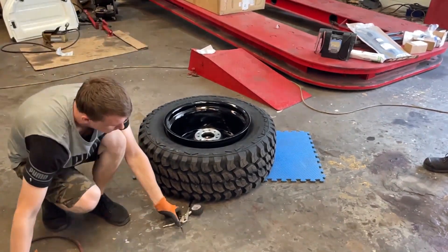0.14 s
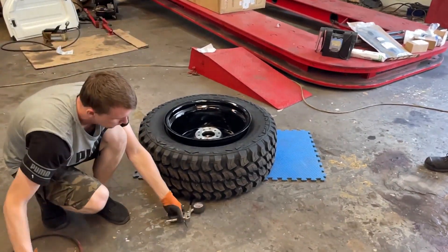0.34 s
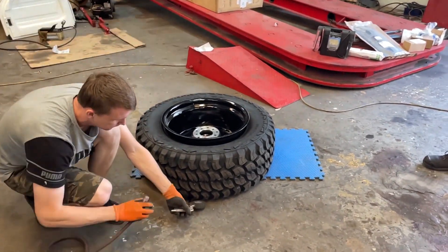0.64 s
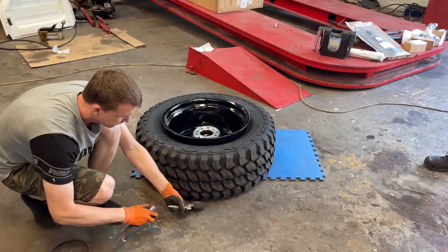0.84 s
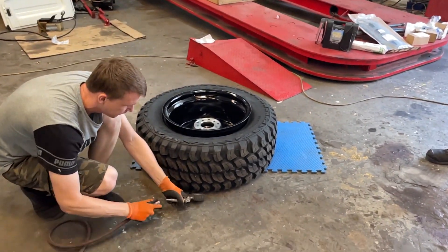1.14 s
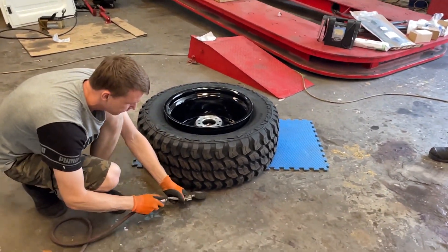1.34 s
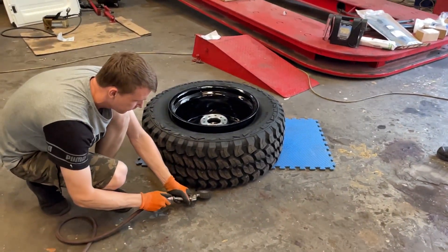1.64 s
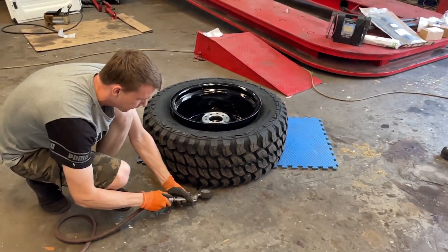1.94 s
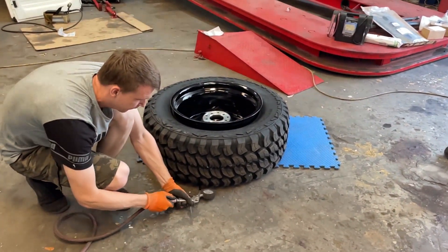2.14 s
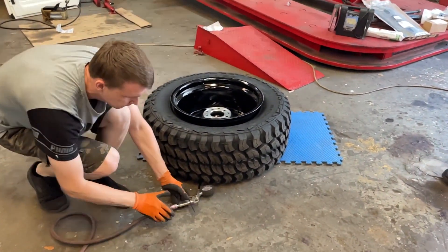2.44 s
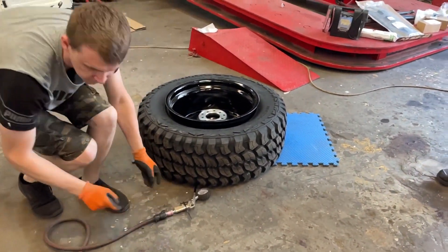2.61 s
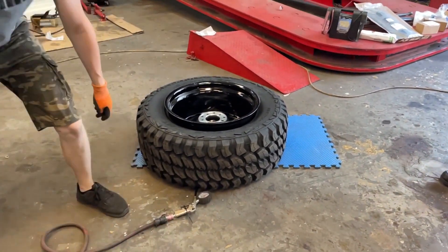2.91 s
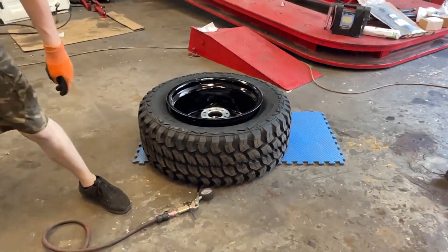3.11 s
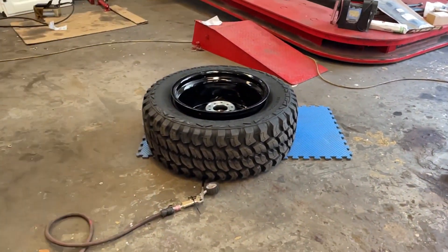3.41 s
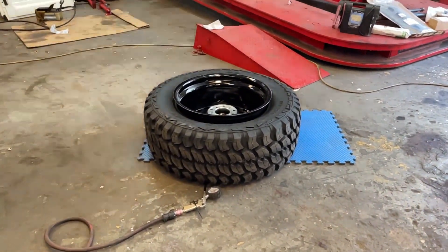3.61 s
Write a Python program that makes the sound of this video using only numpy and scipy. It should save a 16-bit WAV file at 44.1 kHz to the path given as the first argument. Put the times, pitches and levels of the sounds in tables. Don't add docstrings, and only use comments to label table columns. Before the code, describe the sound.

A loud, bright air-hose hiss breaks out after quiet motor drone and a small metal tick

```python
import sys
import numpy as np
from scipy import signal
from scipy.fft import rfft, irfft
from scipy.io import wavfile
from scipy.ndimage import uniform_filter1d

SR = 44100
rng = np.random.default_rng(int(sys.argv[2]) if len(sys.argv) > 2 else 0)


def boost(x):
    u = np.asarray(x, float) / 20
    return 10 ** u


def wrap_up_sound(samples):
    columns = np.atleast_2d(samples).T
    tamed = np.clip(columns, -1, 1)
    steps = np.round(tamed * 32767).astype(np.int16)
    wavfile.write(sys.argv[1], SR, steps)


N = 165816
T = np.arange(N) / SR
HZ = np.fft.rfftfreq(N, 1 / SR)

# t/s, level/dB
AIR_FLOW = [(1.25, -70), (1.42, -45), (1.62, -36.5), (1.646, -36.5), (1.69, -38), (1.95, -38), (2.062, -33),
            (2.081, -21), (2.084, -18), (2.104, -13), (2.15, -17.5), (2.185, -14.5), (2.226, -19.5),
            (2.41, -18), (2.5, -20), (2.67, -19), (2.71, -21.5), (3.76, -21.5)]
# f/Hz, density/dB per Hz
JET_COLOUR = [(250, -45), (900, -16), (2000, -9.5), (3600, -6), (5000, -4.5), (7000, -5.5), (10000, -4),
              (16000, -5.5)]
# f/Hz, width/Hz, level/dB (level unused; every mode is added at the same level)
COUPLING_MODES = [(1700, 9.6, -16), (1995, 43, -13), (2640, 24, -13), (3920, 19, -10), (4610, 49, -8),
                  (5100, 156, -7), (5800, 190, -5), (6155, 42, -6), (8200, 110, -6), (8500, 25, -7),
                  (9020, 180, -3), (10920, 140, -1), (11570, 160, 0), (12060, 22, -3)]
# start/s, length/s, from f/Hz, to f/Hz, level/dB
LEAK_WHISTLES = [(1.53, .18, 10800, 12200, -44), (1.6, .1, 11900, 12200, -48), (1.5, .1, 11300, 11700, -49),
                 (1.48, .3, 5600, 5350, -49), (1.72, .17, 5300, 4950, -48), (1.55, .3, 6000, 6300, -50),
                 (1.8, .27, 6200, 6800, -50), (1.8, .27, 8600, 9300, -49), (1.68, .39, 10700, 11400, -49),
                 (1.43, .2, 7600, 8300, -52), (1.45, .25, 8700, 9100, -52), (1.6, .15, 7400, 7800, -51),
                 (1.5, .3, 6700, 7000, -52), (1.75, .3, 7200, 7700, -55)]
# t/s, peak/dB, f/Hz
TICK_PARTIALS = [(.3571, -24, 8800), (.3573, -35, 11800), (.3574, -41, 13300), (.3575, -42, 15000),
                 (.36, -36, 6000), (.3625, -35, 7400), (.3675, -40, 8500), (1.514, -33, 2700),
                 (1.518, -31, 2950), (1.523, -33, 3300), (1.642, -35, 4400), (1.645, -35, 7800),
                 (1.647, -36, 5800), (1.648, -36, 9300), (1.651, -34, 3500)]
# t/s, level/dB
MOTOR_LOAD = [
    (0, 1),
    (.35, -2.5),
    (.7, -0.5),
    (1.2, 1.5),
    (1.8, 3),
    (2.0, 0),
    (2.07, 4),
    (2.3, 2.5),
    (3.76, -1.5),
]
# multiple of shaft rate, level/dB
MOTOR_ORDERS = [(1, -58), (4, -51), (7, -61.5), (8, -54), (10, -53), (11, -58), (12, -52), (13, -60),
                (14, -56.5)]
# t/s, level/dB
SECOND_ORDER = [(0.0, -48), (0.25, -49), (0.31, -42), (0.75, -48.5), (0.82, -39.5), (1.3, -47),
                (1.56, -42.5), (1.6, -62), (1.8, -48), (1.97, -49), (2.01, -37.5), (2.08, -40)]
# t/s, level/dB
THIRD_ORDER = [(0.0, -56), (0.04, -56.5), (0.65, -46), (0.72, -65), (1.22, -41), (1.33, -63), (1.37, -48),
               (1.47, -53.5), (1.81, -41), (1.84, -55), (2.03, -43), (2.1, -47.5)]
# f/Hz, density/dB per Hz
HALL_COLOUR = [(35, -21), (60, -3), (200, -9.5), (290, -13), (600, -5.5), (850, -8), (3500, -19.5),
               (16000, -39.5)]
# f/Hz, gain/dB
MIC_COLOUR = [(30, 1), (8600, -0.5), (9800, 7.5), (11000, 8.5), (12000, 1), (13000, -0.5), (14000, -8.5),
              (16000, -10.5)]
# f/Hz, likeness/0-1, right lead/rad, left-right level/dB
PORT_PAIR = [(40, 0.98, 0.5, 1.5), (130, 0.99, -0.16, -0.5), (200, 0.85, -1, 1), (450, 0.5, 1, -2),
             (820, .5, 1.5, 0), (2350, 0.49, 1.5, -3), (4870, 0.1, 2.5, 1), (6300, 0.8, 0.5, 4),
             (6800, 0, -3, -7), (7780, 0.74, 1, 3.5), (8860, 0.6, 1, -2), (10000, 0.97, 0, 0.5),
             (12000, 0.91, -0.5, 0)]
# f/Hz, right lead/half turns
TREBLE_TURNS = [(8600, 0), (10200, 1), (12050, 2), (13800, 3), (15600, 4)]
# f/Hz, level/dB per bin
FAINT_LINE = [(60, -96), (300, -75.5), (1000, -75.5), (3500, -72.5), (6000, -78.5), (11000, -85),
              (12200, -75.5), (16000, -72.5)]

TICK_S = 0.3573


def rms_one(x):
    return x / np.sqrt(np.mean(x ** 2) + 1e-20)


def in_time(rows):
    return np.interp(T, *np.transpose(rows))


def at_hz(points, column=1):
    points = np.array(points)
    return np.interp(np.log(HZ + 1), np.log(points[:, 0]), points[:, column])


def colour(x, gain):
    return irfft(rfft(x) * gain, N)


def drift(rate_hz, size=N):
    r = np.exp(-2 * np.pi * rate_hz / SR)
    run_in = SR // 2
    noise = rng.standard_normal(size + run_in)
    slow = signal.lfilter([1], [1, -2 * r, r * r], noise)[run_in:]
    return rms_one(slow - slow.mean())


def ring(start_s, hz, t60_s):
    t = np.maximum(T - start_s, 0)
    return np.sin(2 * np.pi * hz * t) * boost(-60 * t / t60_s)


def jet():
    hose_hz, hose_ring, hose_top_hz = 157.03, 0.45, 3360
    body_per_db, top_per_db, ref_db = 0.19, 0.2, -22
    thin_hz, top_hz = 2730, 9900
    flow_db = in_time(AIR_FLOW)

    loop = hose_ring / (1 + (HZ / hose_top_hz) ** 4)
    comb = np.abs(1 - loop * np.exp(-2j * np.pi * HZ / hose_hz))
    hose = np.sqrt(1 - loop ** 2) / comb
    sputter_db = 0.4 * drift(402)
    noise = rng.standard_normal((2, N)) * boost(sputter_db)
    air = rms_one(colour(noise, boost(at_hz(JET_COLOUR) + at_hz(MIC_COLOUR)) * hose))

    spectrum = rfft(air)
    for hz, width_hz, _ in COUPLING_MODES:
        mode = irfft(spectrum / (1 + ((HZ - hz) / width_hz) ** 2), N)
        flutter_db = 3.5 * drift(6)
        air = air + mode * boost(-3.5 + flutter_db)
    air = rms_one(air)

    top = colour(air, 1 / (1 + (top_hz / (HZ + 1)) ** 8))
    air = air + top * (boost(top_per_db * (flow_db - ref_db)) - 1)
    low = colour(air, 1 / (1 + (HZ / thin_hz) ** 4))
    body = boost(body_per_db * (flow_db - ref_db))
    waver_db = 0.73 * drift(2.5)
    return (air - low + body * low) * boost(flow_db + waver_db)


def whistles():
    width_share = 0.008
    out = np.zeros((2, N))
    for start_s, length_s, from_hz, to_hz, db in LEAK_WHISTLES:
        first, count = int(start_s * SR), int(length_s * SR)
        u = np.arange(count) / count
        turn = 2 * np.pi * np.cumsum(from_hz + (to_hz - from_hz) * u) / SR
        a, b, c, d = (drift(width_share * from_hz, size=count) for _ in range(4))
        left = a * np.cos(turn) + b * np.sin(turn)
        right = c * np.cos(turn) + d * np.sin(turn)
        out[:, first:first + count] += boost(db) * np.sin(np.pi * u) * np.array([left, right])
    return out


def thump():
    start_s, t60_s = 2.213, 0.048
    return boost(-25) * ring(start_s, 169, t60_s) + boost(-33.5) * ring(start_s, 340, t60_s)


def ticks():
    t60_cycles = 30
    echo_db, echo_t60_s = -38, 0.03
    steel = sum(boost(db) * ring(s, hz, t60_cycles / hz) for s, db, hz in TICK_PARTIALS)
    scatter = colour(rng.standard_normal((2, N)), (HZ > 5000) & (HZ < 12500))
    fade = boost(echo_db - 60 * np.maximum(T - TICK_S, 0) / echo_t60_s)
    return steel + scatter * (T > TICK_S) * fade


def motor():
    shaft_hz, wobble_share, beat_db = 51.83, 0.006, 3
    boom_end_s, after_boom_db = SECOND_ORDER[-1][0], -44.5
    turn = 2 * np.pi * np.cumsum(shaft_hz * (1 + wobble_share * drift(2.62))) / SR
    boom_db = np.where(T < boom_end_s, in_time(SECOND_ORDER), after_boom_db)
    out = np.sin(2 * turn) * boost(boom_db)
    out = out + np.sin(3 * turn) * boost(in_time(THIRD_ORDER) - 1.0)
    for order, db in MOTOR_ORDERS:
        phases = rng.uniform(0, 5.64, 2)
        tone = np.sin([order * turn + phase for phase in phases])
        out = out + tone * boost(db + beat_db * drift(2.97) + in_time(MOTOR_LOAD))
    return np.sqrt(2) * out


def casing():
    resonance_hz, width_hz = 611, 130
    gain = 1 / (1 + ((HZ - resonance_hz) / width_hz) ** 4)
    band = colour(rng.standard_normal((2, N)), gain)
    return rms_one(band) * boost(-47 + 2.5 * in_time(MOTOR_LOAD))


def hall():
    hall_db, patchy_db = -34, 1.3
    noise = rfft(rng.standard_normal((2, N))) * boost(at_hz(HALL_COLOUR) + at_hz(MIC_COLOUR))
    out = 0
    for octave in range(10):
        distance = np.clip(np.log2(HZ / 30 + 1e-9) - octave, -1, 1)
        band = np.cos(np.pi / 2 * distance) ** 2
        swell_db = patchy_db * drift(1.7) * (1 < octave < 5)
        load_db = in_time(MOTOR_LOAD) * (octave < 5)
        out = out + irfft(noise * band, N) * boost(swell_db + load_db)
    return boost(hall_db) * rms_one(out)


def gain_control():
    duck_db, threshold_db, lag_s = -14, -23, 0.072
    r = np.exp(-1 / (lag_s * SR))
    loud = np.clip(in_time(AIR_FLOW) - threshold_db, 0, 1)
    return boost(duck_db * signal.lfilter([1 - r], [1, -r], loud))


def ports(paths):
    a, b = rfft(paths)
    alike = np.clip(at_hz(PORT_PAIR, column=1), 0, 1)
    lead = at_hz(PORT_PAIR, column=2) + np.pi * np.interp(HZ, *np.transpose(TREBLE_TURNS))
    tilt = boost(at_hz(PORT_PAIR, column=3) / 2)
    right = alike * a * np.exp(1j * lead) + np.sqrt(1 - alike ** 2) * b
    return irfft([a * tilt, right / tilt], N)


def drop_faint(x):
    follows, chance_spread_db = 0.85, 3.0
    hz, s, z = signal.stft([x[0] + x[1], x[0] - x[1]], SR, nperseg=2048)
    power = np.abs(z / 2) ** 2

    width_bins = (3 * (1 + hz / 3000)).astype(int)
    band = np.cumsum(1 / np.maximum(width_bins, 1)).astype(int)
    starts = np.flatnonzero(np.diff(band, prepend=-1))
    band_sum = np.add.reduceat(power, starts, axis=1)[:, band - band[0]]
    mean = band_sum / np.bincount(band)[band][:, None]
    frame_power = uniform_filter1d(power.sum(axis=(0, 1)), size=3, origin=1)
    frame_db = 10 * np.log10(frame_power + 1e-12)

    line_hz, line_level_db = np.transpose(FAINT_LINE)
    line_db = np.interp(np.log(hz + 1), np.log(line_hz), line_level_db)
    line_db = line_db + 14 * ((hz > 13100) & (hz < 14480))
    line_db = line_db - 2.5 * (hz >= 14480) + 40 * (hz > 15750)
    line_db = line_db + 4 * ((hz > 10130) & (hz < 10330))
    burst_db = -22 * np.outer(hz > 13700, (s > 2.045) & (s < 2.125))
    chance_db = chance_spread_db * rng.standard_normal(power.shape)[:, band]
    threshold_db = line_db[:, None] + follows * (frame_db + 30) + chance_db + burst_db
    keep = mean > boost(2 * threshold_db)
    mid, side = signal.istft(z * keep, SR, nperseg=2048)[1][:, :N] / 2
    return np.array([mid + side, mid - side])


def scene():
    near = jet() + whistles() + thump() + ticks()
    far = motor() + casing() + hall()
    return ports(near + far * gain_control())


def band_limit(x):
    return signal.sosfilt(signal.butter(12, 16290, fs=SR, output="sos"), x)


def record(dry):
    window_s = 0.006
    whole = np.clip(2 - 2 * np.abs(T - TICK_S) / window_s, 0, 1)
    mix = drop_faint(dry * (1 - whole)) + dry * whole
    return band_limit(mix)


dry = scene()
out = record(dry)
wrap_up_sound(out)
```